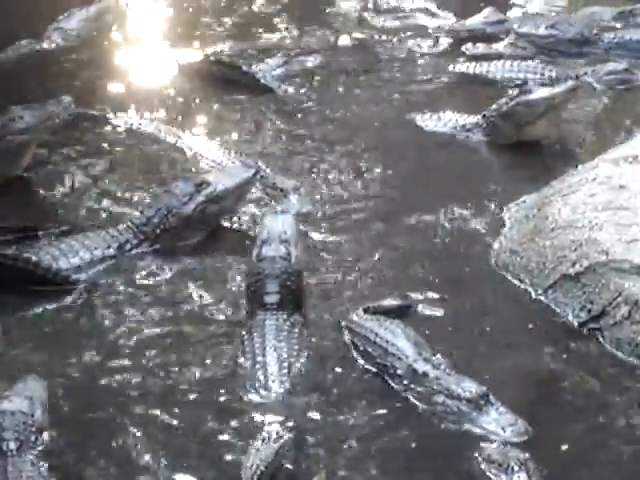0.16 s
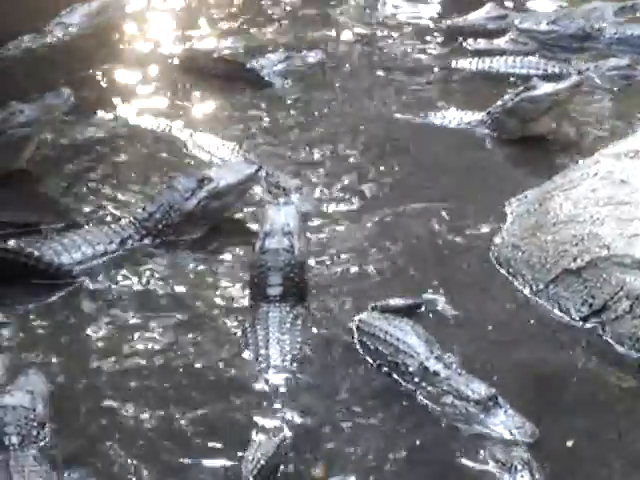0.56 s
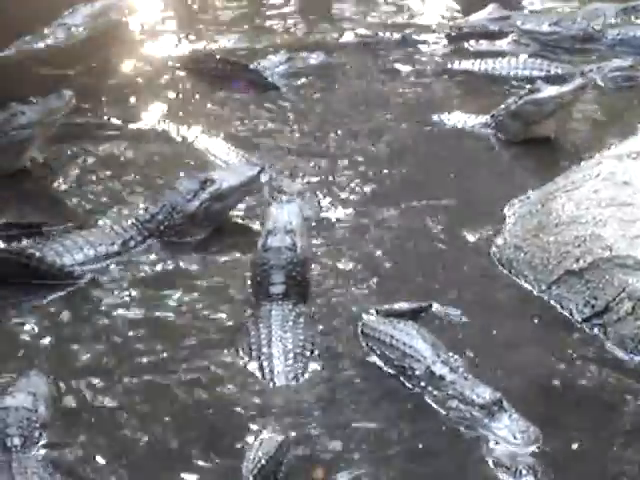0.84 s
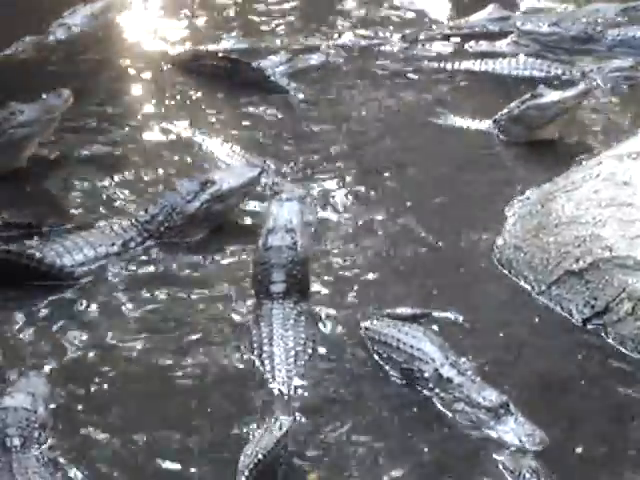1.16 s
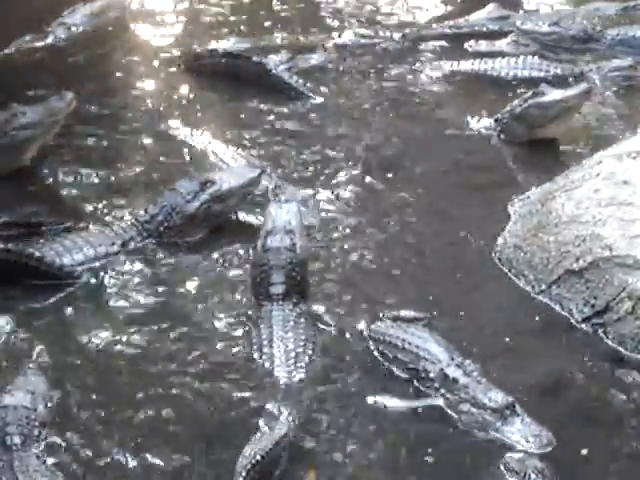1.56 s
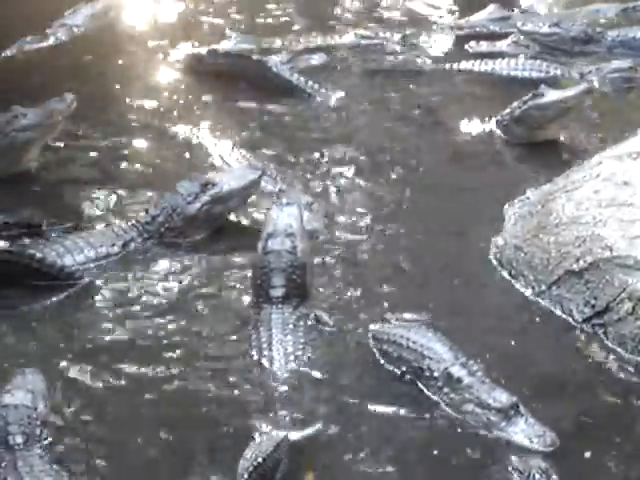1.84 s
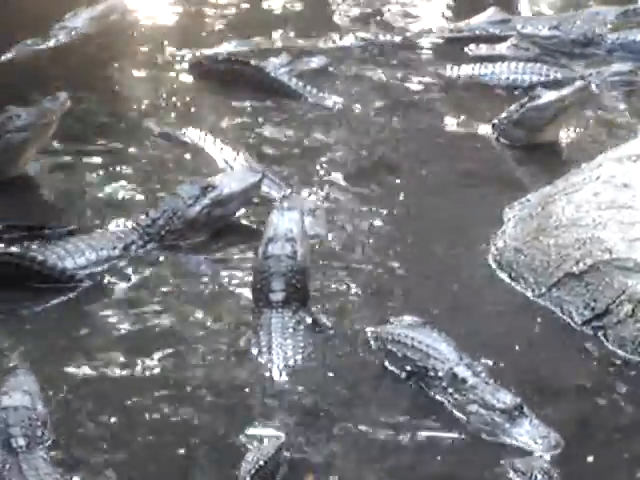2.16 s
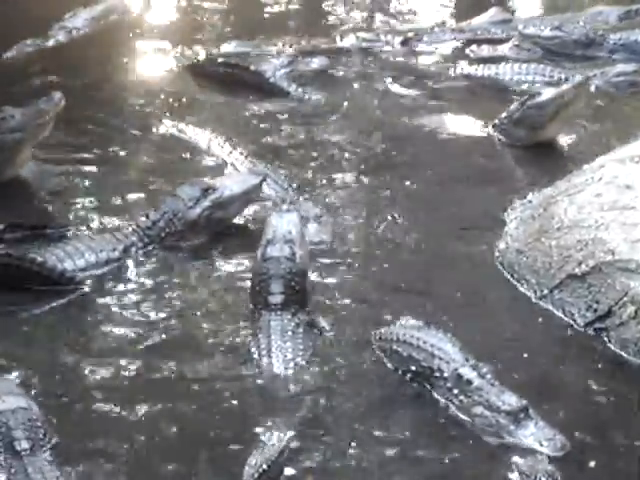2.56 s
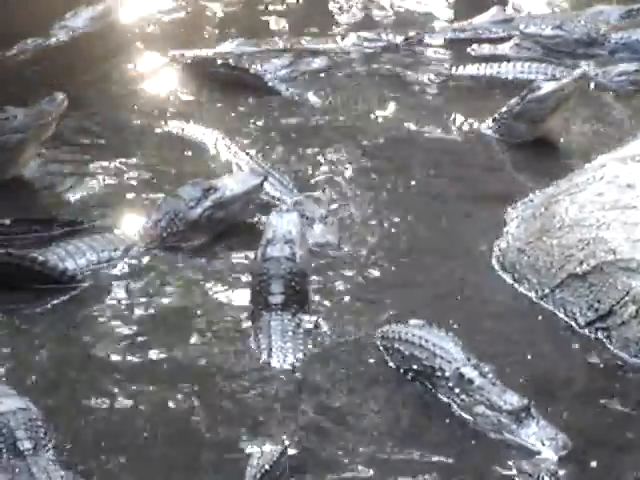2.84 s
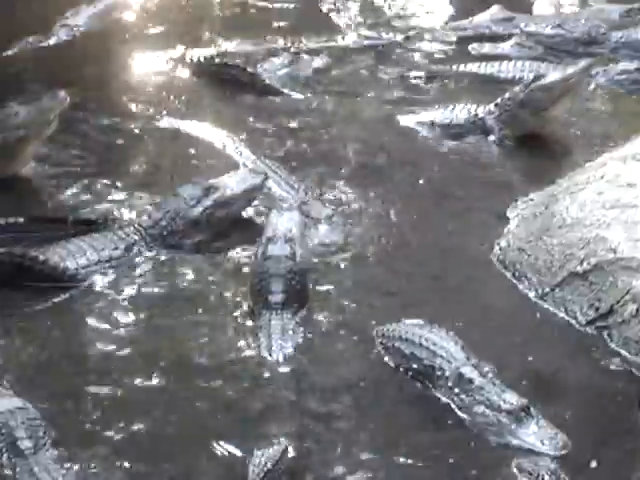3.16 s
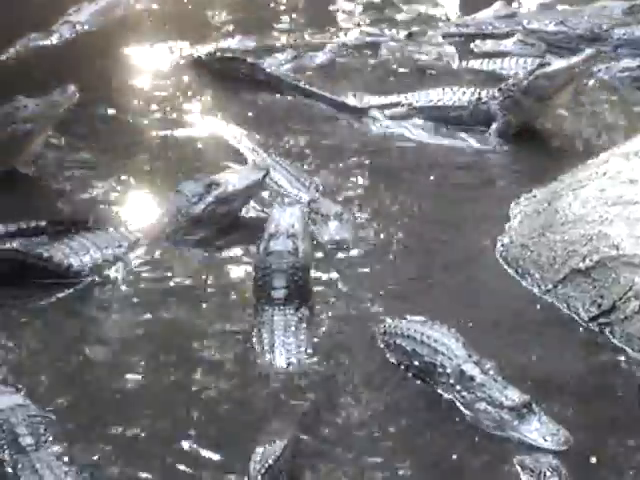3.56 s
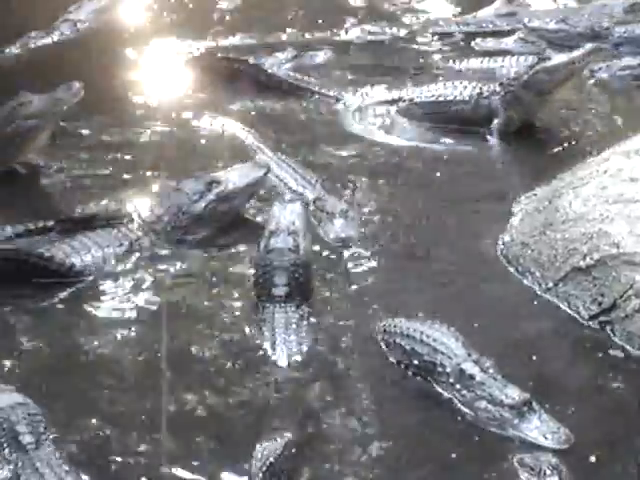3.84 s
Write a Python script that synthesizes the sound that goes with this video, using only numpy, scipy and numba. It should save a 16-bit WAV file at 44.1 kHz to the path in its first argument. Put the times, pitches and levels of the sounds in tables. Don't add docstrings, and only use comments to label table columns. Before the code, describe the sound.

Alligators bellow in a shallow outdoor pond. At first a distant low rumble and a fading one sit under a repeating bird whistle and a thin insect buzz, with a bubbling splash at 0.5 s. A quieter lull follows until 1.9 s, when two near animals throb loudly, with raspy breath and fizzing water. Drops rattle from 2.7 s, a slow pulsing growl runs 2.9-3.7 s, and another bellow rises by 3.9 s.

```python
import sys
import numpy as np
from scipy import signal
from scipy.io import wavfile
from scipy.ndimage import map_coordinates
from numba import njit

SR = 44100
rng = np.random.default_rng(int(sys.argv[2]) if len(sys.argv) > 2 else 0)


def invert_db(x):
    u = np.asarray(x, float) / 20
    return 10 ** u


def wav_out(sig):
    wavfile.write(sys.argv[1], SR, np.round(np.clip(np.atleast_2d(sig).T, -1, 1) * 32767).astype(np.int16))


N = 176400

# start_s, level_db
SHAKEN_WATER = [(0, -44.5), (.4, -55.5), (1.3, -55), (1.89, -55.5), (1.905, -41.5), (2.1, -37),
                (2.45, -37.5), (2.7, -40), (3.2, -44), (3.4, -47.5), (3.89, -49), (3.92, -41), (4, -39)]


def rms_one(x):
    return x / np.sqrt(np.mean(x ** 2) + 1e-20)


def in_time(rows):
    s, *columns = np.transpose(rows)
    return [np.interp(np.arange(N) / SR, s, c) for c in columns]


def drift(rate):
    knots = rng.standard_normal(int(N / SR * rate * 2) + 4)
    coarse = map_coordinates(knots, [np.arange(0, N + 32, 32) / SR * rate * 2], order=3)
    return rms_one(np.interp(np.arange(N) / 32, np.arange(len(coarse)), coarse))


@njit
def resonate(x, cosine, r):
    y = np.zeros(len(x))
    for i in range(2, len(x)):
        y[i] = (1 - r * r) / 2 * (x[i] - x[i - 2]) + 2 * r * cosine[i] * y[i - 1] - r * r * y[i - 2]
    return y


def band(x, hz, width):
    return resonate(x, np.cos(2 * np.pi * hz / SR) * np.ones(N), np.exp(-np.pi * max(width, 5) / SR))


def coloured(spectrum, patchy_db):
    edges = 25 * 2 ** np.arange(0, 9.1, .5)
    white = rng.standard_normal((2, N))
    hz, db = np.transpose(spectrum)
    out = 0
    for k, (low, high) in enumerate(zip(edges, edges[1:])):
        gain = invert_db(np.interp(np.log(low * high) / 2, np.log(hz), db) + patchy_db * drift(12))
        half_octave = signal.butter(2, [low, high], "band", fs=SR, output="sos")
        out = out + gain * signal.sosfilt(half_octave, white[k % 2])
    return rms_one(out)


def grains(per_s, low_hz, high_hz, cycles, spread_db):
    sizes = invert_db(spread_db * np.minimum(rng.exponential(1, N), 5))
    clicks = sizes * rng.choice([-1, 1], N) * (rng.random(N) < per_s / SR)
    dealt = rng.integers(0, 10, N)
    out = 0
    for k, hz in enumerate(np.geomspace(low_hz, high_hz, 10)):
        out = out + band(clicks * (dealt == k) + 1e-18, hz, 2 * hz / cycles) / hz ** .5
    return rms_one(out)


def pond(x):
    t60_s, dull_hz, first_echo_s = 0.81, 3280, .012
    t = np.arange(SR) / SR
    tail = rng.standard_normal(SR) * invert_db(-60 * t / t60_s) * (t > first_echo_s)
    tail = signal.lfilter([1], [1, -np.exp(-2 * np.pi * dull_hz / SR)], tail)
    return signal.fftconvolve(x, tail / np.sqrt(np.sum(tail ** 2)))[:N]


def bellow(span, rate, level_db, throat, rough, jitter, dull_hz, shift=1, sign=-1, shift_hz=900):
    t = np.arange(N) / SR
    on = (t >= span[0][0]) & (t < span[-1][0])
    phase = np.cumsum(on * rate * (1 + jitter * drift(25))) / SR
    flaps = np.diff(np.floor(phase - 1e-9), prepend=-1) > 0
    pulses = flaps * invert_db(.6 * drift(30)) * np.sqrt(SR / rate)
    breath = rng.standard_normal(N) * (.5 + np.exp(-(phase % 1) / 0.68)) * on
    source = np.sqrt(1 - rough) * pulses + np.sqrt(rough) * breath + 1e-18
    source = signal.lfilter(*signal.butter(4, dull_hz, fs=SR), source)
    voice = 0
    for k, (hz, width, db) in enumerate(throat):
        centre = hz * (shift if hz > shift_hz else 1)
        voice = voice + invert_db(db) * band(source, centre, width) * sign ** k
    return invert_db(level_db) * voice / np.std(voice[on])


def nearest_animal():
    # start_s, pulses_per_s
    near_rate = [(1.8665, 39.26), (2.0, 45.04), (2.12, 51.28), (2.25, 51.67), (2.42, 50.25), (2.6, 46.96),
                 (2.8, 43.02), (3.0, 36.99), (3.3, 36.42)]
    # start_s, level_db, resonance_factor
    near_effort = [
        (1.866, -36, 0.97),
        (1.95, -43, 0.91),
        (2.1, -33, 0.97),
        (2.4, -33.5, 0.93),
        (2.6, -35.5, 0.81),
        (2.9, -40.5, 0.64),
        (3.2, -51, 0.6),
        (3.32, -58, 0.54),
    ]
    # resonance_hz, width_hz, level_db
    near_throat = [(52, 30, 1), (102, 35, 0), (200, 90, -4), (470, 150, -10), (720, 200, -8),
                   (1000, 300, -13), (1450, 160, 2), (2300, 500, -19)]
    level_db, reach = in_time(near_effort)
    return bellow(near_rate, *in_time(near_rate), level_db, near_throat, .05, .001, 2400, reach, 1)


def second_animal():
    # start_s, pulses_per_s, level_db
    second_pulses = [(1.875, 55.5, -37), (1.91, 56, -29), (2.1, 57, -28.5), (2.27, 58.3, -32),
                     (2.45, 54, -31), (2.58, 52, -29), (2.75, 48.5, -34), (3.0, 47, -38), (3.05, 46, -50)]
    # resonance_hz, width_hz, level_db
    second_throat = [(116, 30, -12), (178, 60, 0), (236, 60, -2), (410, 100, -7), (550, 80, -5),
                     (690, 120, -10)]
    # start_s, resonance_factor
    second_reach = [(1.88, 1.05), (1.95, .95), (2.45, .97), (2.55, 1.1), (2.75, 1.08), (3.0, 1.08)]
    reach, = in_time(second_reach)
    return bellow(second_pulses, *in_time(second_pulses), second_throat, .7, .035, 1200, reach, -1, 150)


def other_animals():
    # start_s, pulses_per_s, level_db
    far_pulses = [(0, 62, -37), (.15, 60, -40), (.25, 57, -52), (.9, 52, -54), (1.3, 43, -62)]
    fading_pulses = [(.018, 43.5, -46), (.22, 43, -39.5), (.27, 36, -39.5), (.33, 34, -41), (.37, 28, -45),
                     (.44, 27, -56)]
    third_pulses = [(2.9, 45.66, -70), (3.0, 47.09, -35), (3.25, 53.22, -40), (3.57, 45.25, -44.5),
                    (3.75, 40.27, -47.5)]
    next_pulses = [(3.74, 43.73, -43.5), (3.8, 45.93, -37), (3.86, 46.87, -41.5), (3.91, 48.1, -31),
                   (4.0, 50.24, -35)]
    # resonance_hz, width_hz, level_db
    far_throat = [(57, 25, -12), (185, 40, 0), (310, 80, -10), (490, 70, -3), (585, 60, 0), (950, 250, -13)]
    fading_throat = [(120, 50, -9), (245, 50, 0), (500, 100, -12)]
    third_throat = [(50, 6.5, -9.5), (114, 70, -5.5), (281, 85, -2.5), (438, 64, -6), (700, 290, -9),
                    (1910, 79, -21)]
    next_throat = [(139, 57, -3.5), (196, 45, 1), (268, 63, 2), (450, 116, -6), (840, 106, -4),
                   (3040, 300, -20.5)]
    animals = [(far_pulses, far_throat, .2, 1500), (fading_pulses, fading_throat, .12, 900),
               (third_pulses, third_throat, .4, 2500), (next_pulses, next_throat, .45, 3500)]
    return sum(bellow(rows, *in_time(rows), throat, rough, .006, dull_hz)
               for rows, throat, rough, dull_hz in animals)


def growl():
    # peak_s, peak_db
    growl_flaps = [(2.904, -25.5), (2.96, -35), (3.072, -23.5), (3.131, -25), (3.187, -22.5),
                   (3.223, -19.5), (3.275, -22), (3.334, -27.5), (3.374, -28.5), (3.431, -27.5),
                   (3.475, -22.5), (3.532, -31.5), (3.56, -33), (3.616, -31), (3.658, -36)]
    chest_hz, swell_s, overtone_db = 235, .008, -20
    t, out = np.arange(N) / SR, 0
    for (s, db), (a, b, c) in zip(growl_flaps, rng.random((len(growl_flaps), 3))):
        turn = 2 * np.pi * (chest_hz * (1 + 0.075 * (a - .5)) * (t - s) + b)
        swell = np.exp(-((t - s) / swell_s) ** 2)
        out = out + invert_db(db) * swell * (np.sin(turn) + invert_db(overtone_db) * np.sin(3 * turn + 6 * c))
    return out


def chorus():
    near = nearest_animal()
    flaps = growl()
    rest = other_animals() + second_animal()
    echoes = pond(invert_db(-12) * near + invert_db(-6) * rest + invert_db(-12) * flaps)
    return near + rest + flaps + echoes


def rasp():
    # resonance_hz, width_hz, level_db, start_s, end_s
    nostrils = [(3720, 200, -11, -.1, .3), (3150, 120, -11, -.1, .15), (1750, 90, -15, 1.9, 3.0),
                (1810, 70, -5, 3.18, 3.43), (2220, 90, -13, 1.9, 3.2), (2600, 60, -12, 1.9, 3.3),
                (4150, 90, -17, 2.0, 2.6), (4380, 160, -10, 2.26, 2.5), (5540, 130, -14, 2.0, 2.7),
                (3600, 100, -11, 2.5, 2.9), (3110, 140, -10, 2.55, 3.45), (2850, 96, -11, 3.88, 4.1),
                (3430, 60, -14, 3.88, 4.1), (3880, 140, -8, 3.86, 4.1), (4820, 70, -14, 3.9, 4.1)]
    t, white = np.arange(N) / SR, rng.standard_normal(N)
    out = 0
    for hz, width, db, start, end in nostrils:
        fade = np.clip(np.minimum(t - start, end - t) / 0.053, 0, 1)
        ring = rms_one(band(band(white, hz, width), hz, width))
        out = out + invert_db(db + 3.3 * drift(18)) * fade * ring
    return invert_db(in_time(SHAKEN_WATER)[0]) * out


def spray():
    # centre_hz, level_db
    hiss_colour = [(700, -12.5), (1500, -9.5), (3300, -13), (5700, -10), (9000, -10.5), (11000, -18)]
    # start_s, length_s, level_db
    wet_flicks = [
        (1.43, .045, -47),
        (1.535, .012, -49),
        (2.208, .01, -40),
        (3.265, .03, -46),
    ]
    t, (level_db,) = np.arange(N) / SR, in_time(SHAKEN_WATER)
    drops = grains(3000, 2200, 9000, 12.0, spread_db=2.5)
    fizz = coloured(hiss_colour, patchy_db=1.0) + invert_db(-8) * drops
    flicks = sum(invert_db(db) * np.clip(np.minimum(t - s, s + length - t) / 0.001, 0, 1)
                 for s, length, db in wet_flicks)
    return invert_db(level_db + 1.5 * drift(45)) * fizz + flicks * grains(5400, 2260, 8100, 15.0, spread_db=4.0)


def rattle():
    # start_s, peak_db, resonance_hz
    big_drops = [(2.6747, -33.5, 6050), (2.7276, -31, 5810), (2.7625, -37, 5530), (2.7879, -39, 6050),
                 (2.8054, -31, 6250), (2.8498, -29.5, 5930), (2.9087, -31, 5750), (2.9546, -36, 5820),
                 (2.979, -43, 5670), (3.0159, -30.5, 5800), (3.0424, -37, 5800), (3.0623, -42, 5760),
                 (3.1022, -38, 6100), (3.1222, -34, 6640), (3.174, -26.5, 5800), (3.266, -33, 5770),
                 (3.3227, -34, 5820), (3.3611, -40, 5840), (3.42, -41, 6240), (3.4654, -42, 6310)]
    rise_s, width_hz, ring_db, patter_db = .005, 250, -8, -52
    t, push = np.arange(N) / SR, rng.standard_normal(N)
    late = np.clip(np.minimum(t - big_drops[0][0], big_drops[-1][0] - t) / 0.045, 0, 1)
    out = invert_db(patter_db + 5.1 * drift(30)) * late * grains(2100, 5600, 6500, 60.0, spread_db=5.0)
    for s, db, hz in big_drops:
        u = np.maximum(t - s, 0) / rise_s
        ring = rms_one(band(band(push, hz, width_hz), hz, width_hz))
        out = out + invert_db(db + ring_db) * u * np.exp(1 - u) * ring
    return out


def splash():
    # start_s, peak_db, pitch_hz
    gulps = [(.475, -37, 980), (.56, -26, 850), (.523, -25.5, 590), (.544, -27, 538), (.555, -22.5, 604),
             (.594, -27, 700), (.636, -31.5, 804), (.669, -34, 780), (.698, -42, 760), (.722, -33.5, 720)]
    decay_cycles, pitch_rise = 6, 0.17
    patter_s, patter_db, patter_t60_s = .525, -36, 1.1
    t, out = np.arange(N) / SR, 0
    for s, db, hz in gulps:
        u = np.clip((t - s) * hz, 0, 60)
        envelope = invert_db(db + 5.5 - 20 * u / decay_cycles) * np.minimum(u / 2, 1)
        out = out + envelope * np.sin(2 * np.pi * u * (1 + pitch_rise * u / 20))
    u = np.maximum(t - patter_s, 0)
    envelope = invert_db(patter_db - 60 * u / patter_t60_s) * np.minimum(u / .06, 1)
    out = out + envelope * grains(900, 520, 1150, 10.0, spread_db=4.0)
    return out + invert_db(-6.5) * pond(out)


def bird():
    # start_s, level_db, early_slide_s (into the first note)
    phrases = [
        (-.05, -53, 0),
        (.33, -48.5, 0),
        (.72, -48.5, 0),
        (1.14, -48.5, .05),
    ]
    # offset_s, length_s, from_hz, to_hz, glide_s, level_db
    whistles = [
        (-.01, .16, 3650, 4290, .05, -4),
        (.03, .12, 4080, 4120, .04, -9),
        (.132, .06, 3600, 2800, .012, 2),
        (.215, .05, 2240, 2225, .02, 1),
        (.262, .035, 2300, 2750, .04, 4),
    ]
    t, out = np.arange(-SR // 2, N) / SR, 0
    for start, phrase_db, early in phrases:
        for offset, length, from_hz, to_hz, glide, db in whistles:
            lead = early * (offset < 0)
            u = t - start - offset + lead
            length, glide, from_hz = length + lead, glide + 1.5 * lead, from_hz - 8000 * lead
            hz = to_hz + (from_hz - to_hz) * np.exp(-np.maximum(u, 0) / (glide / 2))
            fade = np.clip(np.minimum(u, length - u) / 0.0033, 0, 1)
            out = out + invert_db(phrase_db + db) * fade * np.sin(2 * np.pi * np.cumsum(hz) / SR)
    out = out[SR // 2:] * invert_db(3.5 * drift(70) - 1.5)
    return out + invert_db(-6) * pond(out)


def insects():
    from_hz, to_hz, end_s, strokes_per_s, near_db = 8200, 8090, .765, 85, -49
    far_hz, far_db = 8035, -67
    t = np.arange(N) / SR
    hz = from_hz + (to_hz - from_hz) * t / end_s + 50 * drift(30) + 150 * drift(150)
    beat = np.sin(2 * np.pi * np.cumsum(strokes_per_s * (1 + 0.18 * drift(23))) / SR)
    strokes = np.clip(0.88 + 1.8 * beat + .9 * drift(45), 0, 1.5) * invert_db(3 * drift(20))
    fade = np.clip((end_s - t) / 0.021, 0, 1)
    near = invert_db(near_db) * strokes * fade * np.sin(2 * np.pi * np.cumsum(hz) / SR)
    far = rms_one(band(band(rng.standard_normal(N), far_hz, 70), far_hz, 70))
    return near + invert_db(far_db) * far


def open_air():
    # centre_hz, level_db
    air_colour = [(30, -1), (52, -1.5), (80, 0), (200, -2), (800, -2.5), (2500, -7), (5900, -14),
                  (11000, -43)]
    return invert_db(-43) * coloured(air_colour, patchy_db=1.5)


def scene():
    animals = chorus() + rasp()
    water = spray() + rattle() + splash()
    return (animals + water + bird() + insects() + open_air())[None]


def low_pass(x):
    return signal.sosfilt(signal.butter(12, 10850, fs=SR, output="sos"), x)


def record(dry):
    cutoff_hz = 10250
    x = signal.sosfilt(signal.butter(2, 40, "high", fs=SR, output="sos"), dry)
    x = signal.sosfilt(signal.cheby2(24, 60, cutoff_hz * 1.02, fs=SR, output="sos"), x)
    return low_pass(x)


dry = scene()
out = record(dry)
wav_out(out)
```